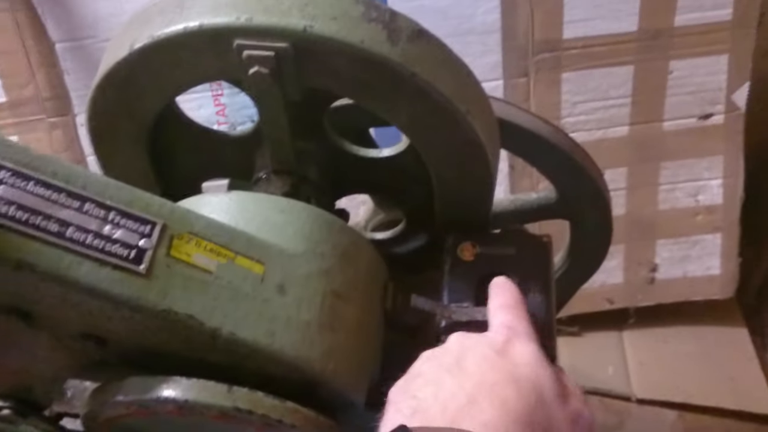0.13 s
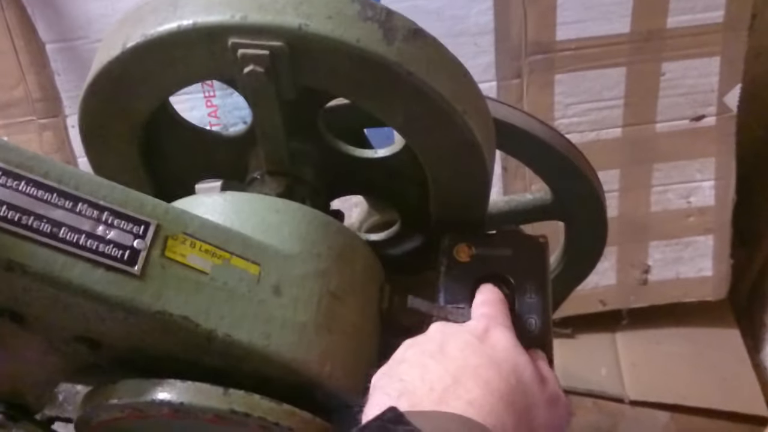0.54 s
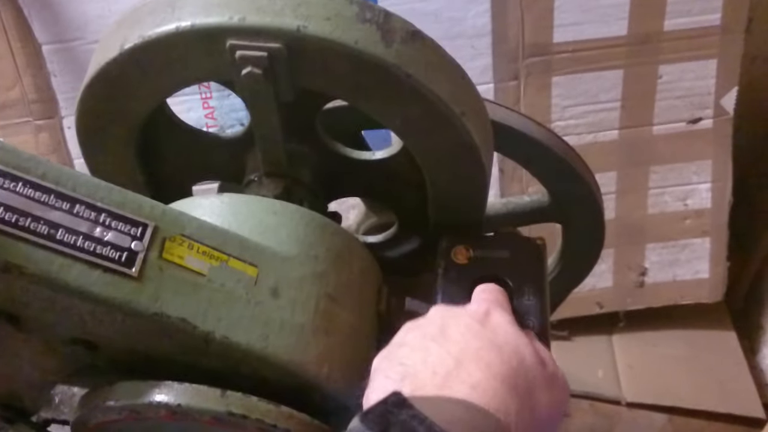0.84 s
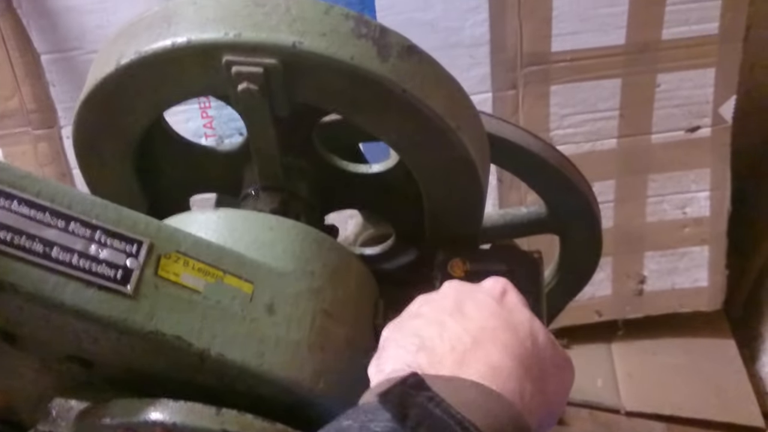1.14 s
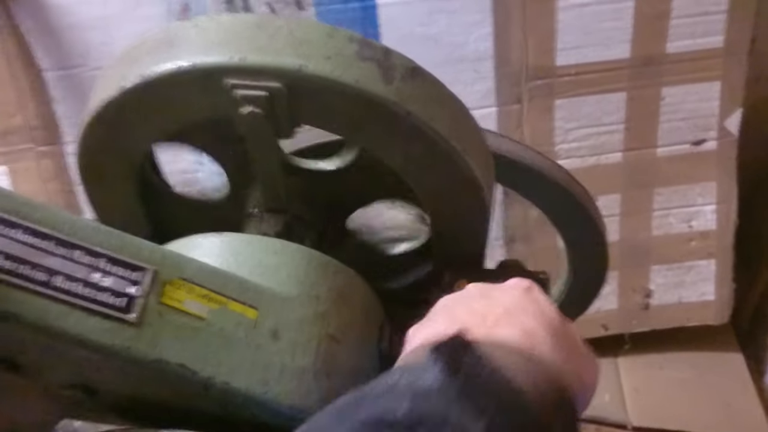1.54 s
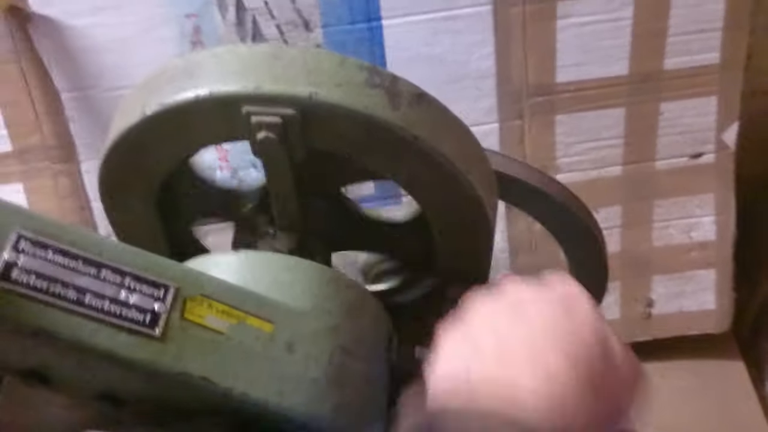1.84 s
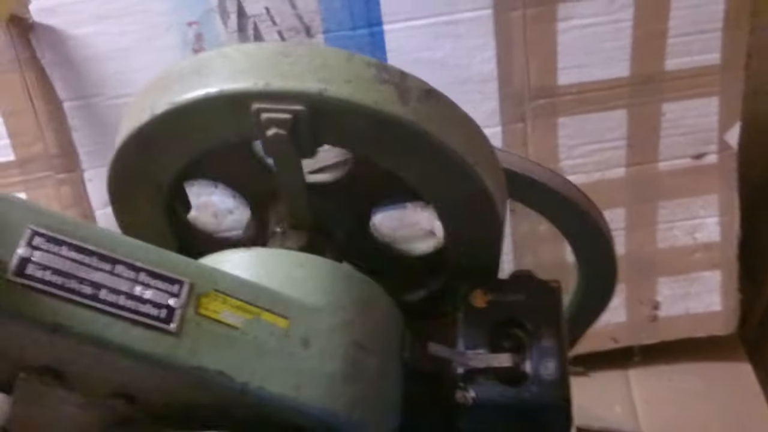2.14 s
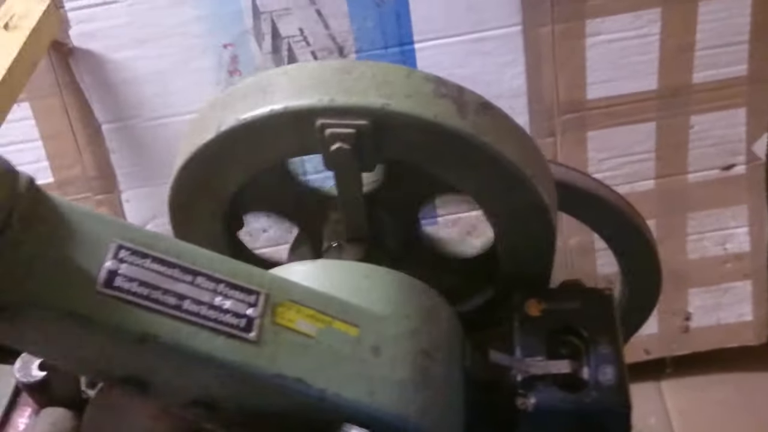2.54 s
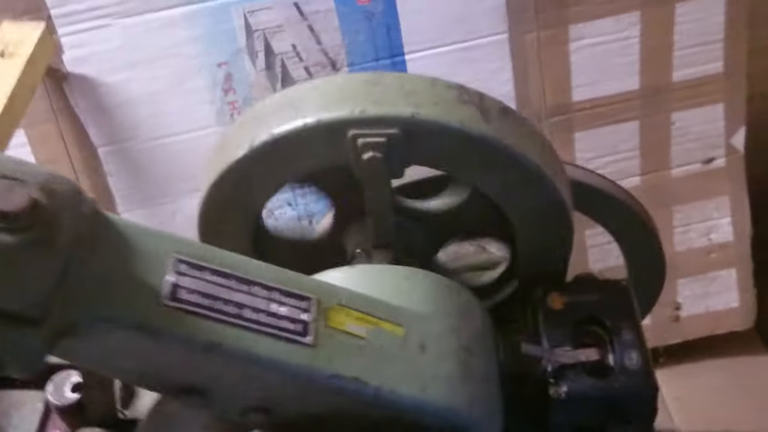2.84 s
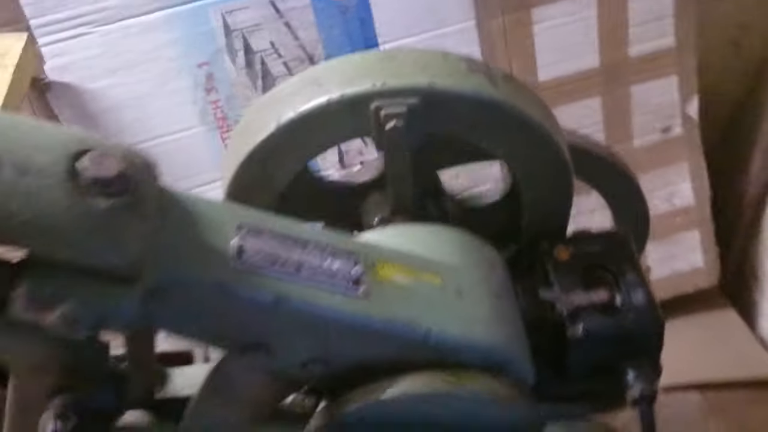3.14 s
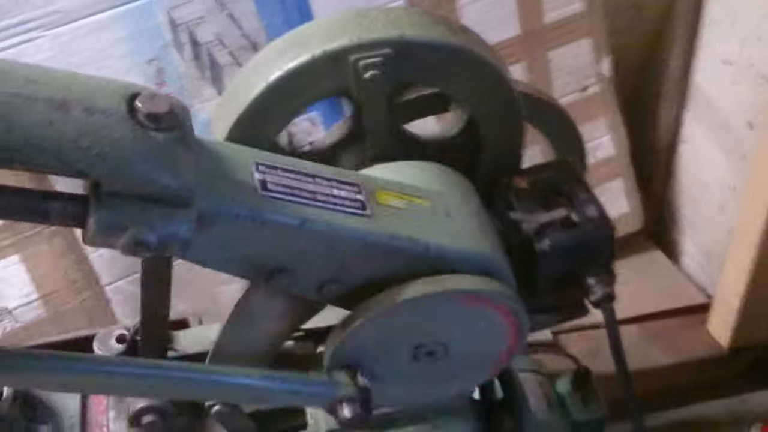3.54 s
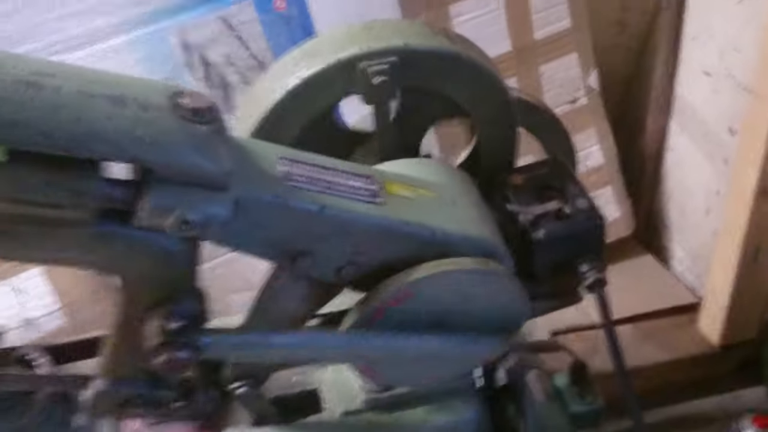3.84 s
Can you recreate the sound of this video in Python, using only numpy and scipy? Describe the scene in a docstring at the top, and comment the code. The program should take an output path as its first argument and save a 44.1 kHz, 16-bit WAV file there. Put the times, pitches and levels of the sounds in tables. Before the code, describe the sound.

An old power hacksaw starts up in a small workshop. A sleeve rustles faintly and a switch knocks, then the drive judders and runs with grinding gears, singing bearings and a sharp metal clack on every stroke.

```python
"""An old power hacksaw in a small workshop, heard through two microphone ports of opposite polarity.
A sleeve rustles and the switch knocks. At 1.4 s the motor buzzes faintly, then the drive takes up with
a judder and runs: gear teeth grind in the iron frame and the motor bearings sing. From 2 s the saw bow
clacks once a stroke, with a lighter knock and a rubbed ring at the far end; the frame drones on the cut."""
import sys
import numpy as np
from scipy import signal
from scipy.fft import rfft, irfft
from scipy.io import wavfile

SR = 44100
rng = np.random.default_rng(int(sys.argv[2]) if len(sys.argv) > 2 else 0)


def put_to_file(sound):
    """Save the sound as 16-bit audio at rate SR, in the file named by the first command-line argument."""
    columns = np.atleast_2d(sound).T  # one column per channel
    safe = np.clip(columns, -1, 1)
    whole_steps = np.round(safe * 32767)
    wavfile.write(sys.argv[1], SR, whole_steps.astype(np.int16))


N = 176400

START_S, SPIN_UP_S, STROKE_S = 1.462, 0.034, .749
MESH_HZ, MOTOR_HZ, PINION_TEETH = 128.12, 24.6, 25
ATTACK_S, ROOM_T60_S = .0012, 0.39

# still room: freq_hz, gain_db
AIR_SPECTRUM = [(20, -15), (60, 3), (300, -0.5), (1200, 0), (3000, -5), (16000, -26)]
# sleeve rustle: time_s, level_db
SLEEVE_ENVELOPE = [(0, -50), (.17, -47.5), (.29, -53), (.35, -62.5), (.41, -63.5), (.47, -59.5),
                   (.58, -57.5), (.66, -76), (.74, -74), (.83, -63), (1.03, -56.5), (1.2, -64.5),
                   (1.25, -60), (1.31, -68.5), (1.37, -59.5), (1.44, -74), (1.62, -49.5), (1.76, -46.5),
                   (1.81, -58), (1.879, -47), (2.0, -49.5), (2.15, -58.5), (2.45, -51), (2.7, -60),
                   (3.1, -74), (4, -64)]
# cloth hiss: freq_hz, gain_db
CLOTH_SPECTRUM = [(60, -34), (300, -4.5), (900, -1.5), (1350, 7), (1900, -3), (3500, 1.5), (5000, 0),
                  (6500, 0), (9000, 6.5), (11000, 3), (16000, -6)]
# sharp modes of the casting: freq_hz, width_hz, lift_db
IRON_MODES = [(1143, 10, 0.5), (1278, 13, 3.5), (1653, 22, -5), (2167, 12, 0), (2600, 37, 8.5),
              (2970, 80, 4.5), (3194, 81, 8.5), (3476, 110, 8.5), (4124, 62, 8), (4660, 100, 5.5),
              (5300, 87, 7.5), (6780, 67, 3), (8100, 180, -2), (9000, 250, 8.5)]
# switch and linkage knocks: start_s, level_db, tilt_db_per_octave, t60_s
KNOCK_HITS = [(.432, -54, 7, .05), (1.131, -43, -6.5, 0.046), (1.377, -38.5, 0, 0.059),
              (1.4976, -17, 9, 0.049), (1.505, -24, 9, 0.043), (2.298, -22.5, 0.5, 0.077),
              (3.049, -20, -2, 0.084), (3.516, -21, -6, .2), (3.77, -24, -9.5, 0.24),
              (3.797, -25, -1, 0.18)]
# light knock: freq_hz, gain_db
KNOCK_SPECTRUM = [(200, -27), (800, -14.5), (1300, 3.5), (2200, 3), (3000, -12), (4200, -7), (5200, -14.5),
                  (7000, -20.5), (10000, -28.5), (16000, -40)]
# rubbed iron: start_s, length_s, pitch_hz, level_db
RUB_RINGS = [(1.452, 0.15, 4122, -36), (1.653, 0.089, 3520, -42.5), (1.704, 0.052, 4122, -43.5),
             (1.79, 0.081, 3120, -42), (2.261, 0.17, 1412, -18.5), (3.028, 0.061, 1412, -17.5),
             (3.045, 0.095, 3540, -36), (3.518, 0.051, 1412, -16), (3.749, 0.11, 1412, -24.5)]
# drive take-up: start_s, thud_db, low_ring_db, high_ring_db
JUDDER_HITS = [(1.453, -61, -28, -52), (1.461, -16, -5.5, -44), (1.470, -12.5, -29, -7.5),
               (1.4819, -13, -1.5, -20), (1.5, -12, -18, -21), (1.51, -29, -30, -15),
               (1.528, -15, -25, -32), (1.536, -15.5, -32, -3), (1.559, -17, -19, -10),
               (1.562, -34, -24, -6.5)]
# take-up thud: freq_hz, gain_db
THUD_SPECTRUM = [(40, -35), (200, -34), (450, -11), (800, 0), (1100, -4), (1450, 6.5), (1900, -15.5),
                 (2700, -14), (3700, -26.5), (4150, -20), (4800, -22.5), (5500, -31), (9000, -36),
                 (16000, -53)]
# gear noise in the frame: freq_hz, gain_db
FRAME_SPECTRUM = [(20, -32), (55, -19.5), (110, -19), (200, -22.5), (300, -11), (450, -9.5), (530, -4.5),
                  (680, -3), (860, -3), (1050, 2), (1300, 3.5), (1500, 3.5), (1750, 2.5), (2100, -0.5),
                  (2500, -11), (3200, -19), (4200, -24), (5500, -30), (6800, -31), (8500, -37.5),
                  (11000, -39.5), (16000, -54)]
# gear hum: mesh_harmonic, level_db
HUM_PARTIALS = [(2, -59), (3, -48), (4, -58.5), (5, -50), (11, -49), (15, -40)]
# frame drone on the cut: freq_hz, gain_db
CUT_SPECTRUM = [(200, -24), (380, -1), (450, -25.5), (530, 7.5), (660, 6.5), (900, -6.5), (1500, -4),
                (2500, -37), (16000, -66)]
# bearing rings: pitch_hz, half_width_hz, level_db
BEARING_MODES = [(794, 10.3, -42), (1068, 23, -46), (1417, 42, -32.5), (1922, 16, -34.5), (1982, 18, -31),
                 (2215, 20, -39), (2450, 20, -63), (3075, 19, -62), (3520, 31, -53.5), (4130, 17, -61),
                 (5880, 31, -65), (6710, 370, -62)]
# bow clacks: start_s, level_db
CLACK_HITS = [(2.0373, -7.5), (2.7865, -7), (3.537, -7.5)]
# chatter after each clack: delay_s, gain_db
CLACK_BOUNCES = [(.0125, -7.5), (0.031, -13.5), (.05, -16.5)]
# bow clack: freq_hz, gain_db
CLACK_SPECTRUM = [(40, -31), (200, -43), (550, -49), (800, -13), (1100, 6.5), (1450, 2.5), (1620, 0),
                  (2250, 3), (2800, -9.5), (4300, -12.5), (5100, -19.5), (6700, -16.5), (7300, -21.5),
                  (9000, -20.5), (10300, -26.5), (13000, -36), (16000, -51)]
# left microphone port: freq_hz, gain_db
LEFT_RESPONSE = [(60, -4.5), (200, 2), (380, -6), (700, -4.5), (1000, -8), (1350, -11), (1800, -14.5),
                 (2250, -4.5), (3200, -5.5), (4300, -8), (5300, -0.5), (6600, 14), (9000, 3), (10500, -2),
                 (12000, -10), (16000, -2)]
# right microphone port: freq_hz, gain_db
RIGHT_RESPONSE = [(60, 0), (7000, 1.5), (9000, -8.5), (11000, -5), (13000, 2), (16000, 3)]


def undb(db):
    return 10 ** (np.asarray(db) / 20)


def unit(x):
    """Scale to rms 1."""
    return x / np.sqrt(np.mean(x ** 2))


def clock():
    return np.arange(N) / SR


def freqs():
    return np.maximum(np.fft.rfftfreq(N, 1 / SR), 1)


def curve(points):
    """Gain in dB per FFT bin from (Hz, dB) points."""
    hz, db = np.array(points).T
    return np.interp(np.log(freqs()), np.log(hz), db)


def colour(x, points):
    """Filter by (Hz, dB) points."""
    return irfft(rfft(x) * undb(curve(points)), N)


def noise(corner_hz=746):
    """White noise at two ports: alike in the bass, unrelated in the treble."""
    coherence = 0.83 / (1 + (freqs() / corner_hz) ** 4)
    mid, side = rfft(rng.standard_normal((2, N)))
    mid, side = mid * np.sqrt(1 + coherence), side * np.sqrt(1 - coherence)
    return unit(irfft(np.array([mid + side, mid - side]), N))


def walk(rate_hz):
    """Smooth random drift, rms 1."""
    return unit(irfft(rfft(rng.standard_normal(N)) * np.exp(-(freqs() / rate_hz) ** 2), N))


def fade(start_s, t60_s):
    """Fast attack, exponential decay."""
    age_s = clock() - start_s
    return np.clip(age_s / ATTACK_S, 0, 1) * np.exp(-np.log(1000) * np.maximum(age_s, 0) / t60_s)


def each_stroke(peak_s, width_strokes):
    """Swell from 0 to 1, once a stroke."""
    offset_strokes = ((clock() - peak_s) / STROKE_S + .5) % 1 - .5
    return np.exp(-(offset_strokes / width_strokes) ** 2)


def resonate(x, hz, width_hz):
    """One resonance, rms 1; two passes for steep skirts."""
    b, a = signal.iirpeak(hz, hz / width_hz * .64 / .64 ** 2, fs=SR)
    return unit(signal.lfilter(b, a, signal.lfilter(b, a, x)))


def ring_iron(x, curve_db):
    """The casting: broad colour plus sharp modes, ringing on at equal power."""
    modes_db = sum(lift_db / (1 + ((freqs() - hz) / (width_hz / 2)) ** 2)
                   for hz, width_hz, lift_db in IRON_MODES)
    cepstrum = irfft(np.log(unit(undb(curve_db + modes_db))), N)
    cepstrum[1:] *= 2  # minimum phase
    response = irfft(np.exp(rfft(cepstrum[:N // 2], N)), N)[:SR // 10]
    return signal.fftconvolve(x, response[None], axes=1)[:, :N]


def blows(hits, curve_db, t60_s, room_db):
    """Each blow briefly rings the dense modes of the casting; the room carries it on."""
    power = sum(undb(db) ** 2 * (fade(s, t60_s) ** 2 + (undb(room_db) * fade(s, ROOM_T60_S)) ** 2)
                for s, db in hits)
    return ring_iron(noise() * np.sqrt(power), curve_db)


def air(level_db=-63):
    """Steady hush of the still room."""
    return undb(level_db) * unit(colour(noise(), AIR_SPECTRUM))


def sleeve():
    """Smooth jacket cloth hisses as the arm moves."""
    time_s, level_db = np.array(SLEEVE_ENVELOPE).T
    hiss = unit(colour(noise(), CLOTH_SPECTRUM))
    return hiss * undb(np.interp(clock(), time_s, level_db) + 0.75 * walk(40))


def knocks():
    """Switch and slack linkage knock: some bright and short, some dull and loose."""
    octaves = np.log2(np.clip(freqs(), 1000, 7550))
    return sum(blows([(s, db)], curve(KNOCK_SPECTRUM) + tilt * octaves, t60_s, room_db=-15)
               for s, db, tilt, t60_s in KNOCK_HITS)


def strain(from_s=1.392, level_db=-56):
    """The motor buzzes as it takes current, before the drive moves."""
    t = clock()
    buzz = resonate(noise(), hz=980, width_hz=500)
    return undb(level_db) * buzz * (t > from_s) * (t < START_S)


def rubs():
    """Rubbing iron swells into brief, wavering rings."""
    t, waver_rad = clock(), 0.46 * walk(39)
    rings = 0
    for start_s, length_s, hz, db in RUB_RINGS:
        swell = np.sin(np.pi * np.clip((t - start_s) / length_s, 0, 1))
        rings += undb(db) * swell * np.sin(2 * np.pi * hz * t + waver_rad)
    return np.sqrt(2) * rings * undb(0.37 * walk(60))


def judder(rings_hz=(1064, 1437), ring_t60_s=0.06):
    """The drive snatches at slack gears: a run of thuds, each feeding two rings."""
    out = blows([hit[:2] for hit in JUDDER_HITS], curve(THUD_SPECTRUM), t60_s=0.063, room_db=-10)
    for column, hz in enumerate(rings_hz, start=2):
        power = sum((undb(hit[column]) * fade(hit[0], ring_t60_s)) ** 2 for hit in JUDDER_HITS)
        out += np.sqrt(power) * np.sin(2 * np.pi * hz * clock())
    return out


def tooth_ticks(mesh_cycles, scatter_db=1.5, decay_s=0.0072):
    """Teeth meet unevenly, one tick each; wear repeats every pinion turn."""
    meets = np.flatnonzero(np.diff(np.floor(mesh_cycles)))
    wear = np.resize(rng.standard_normal(PINION_TEETH), N)
    unevenness = (wear + rng.standard_normal(N)) / np.sqrt(2)
    pulses = np.zeros(N)
    pulses[meets] = undb(scatter_db * unevenness[:len(meets)])
    tick = noise() * (np.exp(-clock() / decay_s) + undb(-24.5) * fade(0, ROOM_T60_S))
    return unit(signal.fftconvolve(tick, pulses[None], axes=1)[:, :N])


def gears(tick_db=-38, grind_db=-29.5, flicker_db=1.3, load_db=5.5):
    """Teeth tick and grind in the frame, harder on the bow's return, and hum at mesh harmonics."""
    mesh_cycles = np.cumsum(MESH_HZ * (1 + .003 * walk(3.968))) / SR
    ticks = undb(tick_db) * tooth_ticks(mesh_cycles)
    grind = undb(grind_db) * noise() * undb(flicker_db * walk(33))
    hum = 0
    for harmonic, db in HUM_PARTIALS:
        phase_rad = 2 * np.pi * harmonic * mesh_cycles + .5 * walk(9.7)
        hum += np.sqrt(2) * np.sin(phase_rad) * undb(db + 2 * walk(3.3))
    load = undb(load_db * each_stroke(peak_s=2, width_strokes=0.031))
    return load * ring_iron(ticks + grind, curve(FRAME_SPECTRUM)) + hum


def cut_drone(level_db=-37):
    """The frame drones low on the cutting stroke."""
    swell = each_stroke(peak_s=2.66, width_strokes=0.27)
    return undb(level_db) * swell * unit(colour(noise(), CUT_SPECTRUM))


def bearings(throb_depth=0.32, rise_s=0.53):
    """Bearing noise rings narrow modes and throbs once a motor turn."""
    throb = 1 + throb_depth * np.sin(2 * np.pi * MOTOR_HZ * clock() + 0.24 * walk(1.7))
    rings = sum(undb(db) * resonate(rng.standard_normal(N) + 0.74 * noise(), hz, 2 * width_hz)
                for hz, width_hz, db in BEARING_MODES)
    return rings * unit(throb) * np.clip((clock() - START_S) / rise_s, 0, 1)


def bow(rattle_db=1.6, rattle_hz=131):
    """The bow clacks, bounces and rattles once a stroke."""
    bounces = [(s + delay_s, db + gain_db) for s, db in CLACK_HITS for delay_s, gain_db in CLACK_BOUNCES]
    rattle = undb(rattle_db * walk(rattle_hz))
    return rattle * blows(CLACK_HITS + bounces, curve(CLACK_SPECTRUM), t60_s=0.066, room_db=-14)


def scene():
    running = np.clip((clock() - START_S) / SPIN_UP_S, 0, 1)
    drive = running * (gears() + cut_drone() + bearings())
    return air() + sleeve() + knocks() + strain() + rubs() + judder() + drive + bow()


def record(dry, ceiling=1.1, top_hz=15900):
    """Each port coloured, left inverted, peaks rounded, top cut."""
    ports = np.array([-colour(dry[0], LEFT_RESPONSE), colour(dry[1], RIGHT_RESPONSE)])
    lowpass = signal.ellip(10, .2, 80, top_hz, fs=SR, output="sos")
    return signal.sosfilt(lowpass, ceiling * np.tanh(ports / ceiling))


dry = scene()
out = record(dry)
put_to_file(out)
```